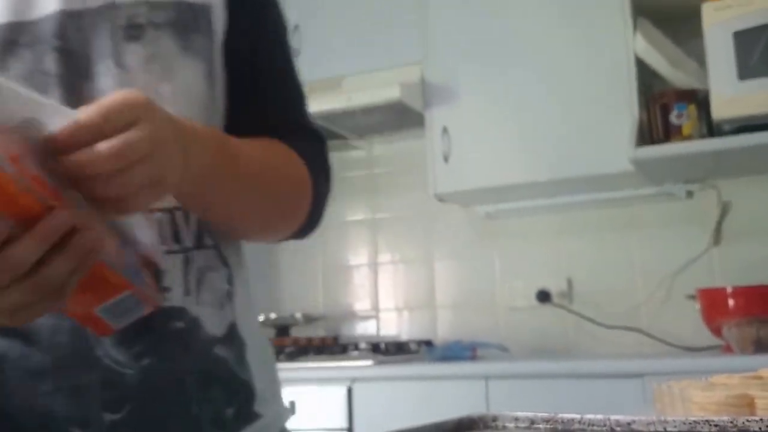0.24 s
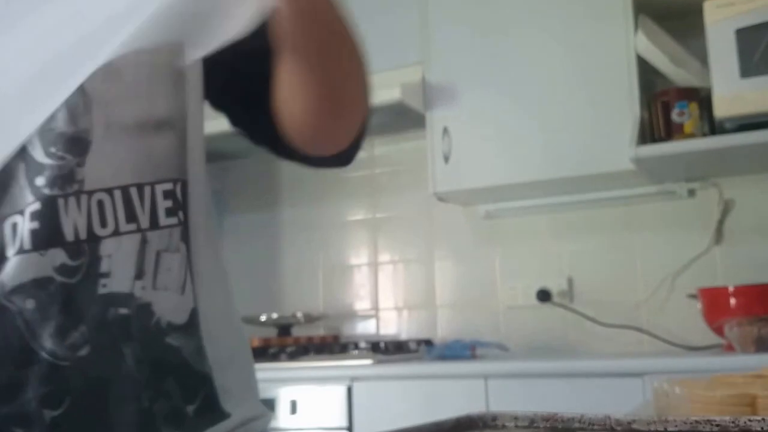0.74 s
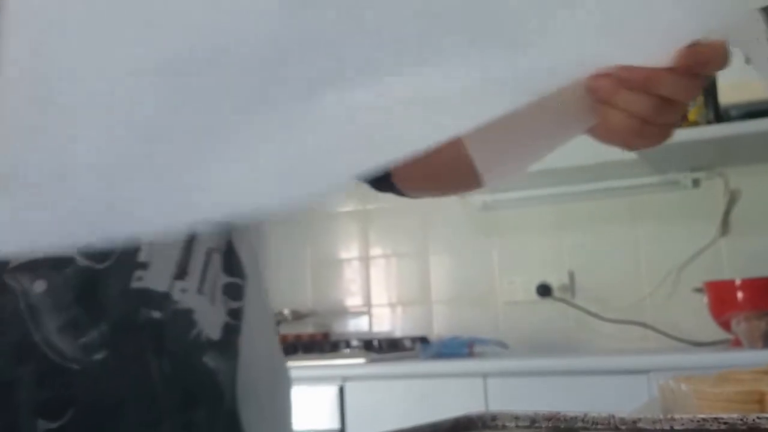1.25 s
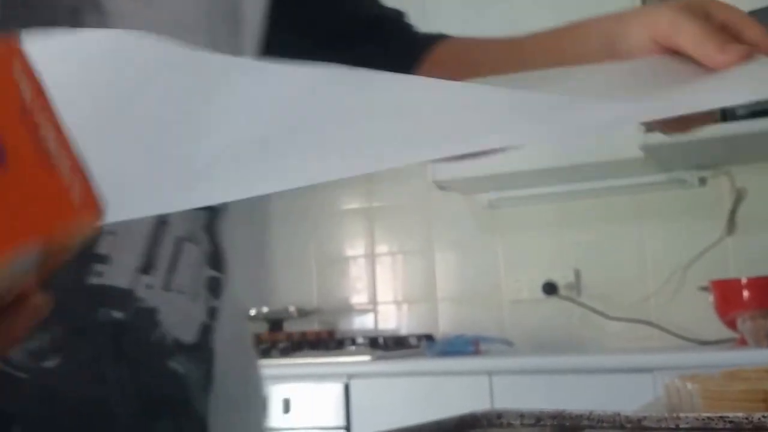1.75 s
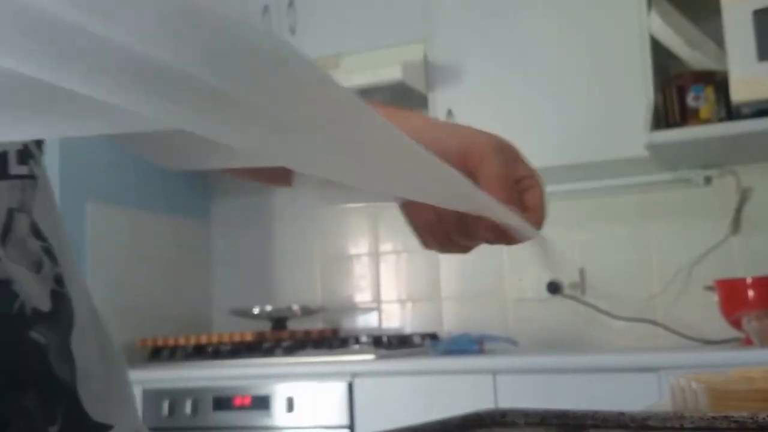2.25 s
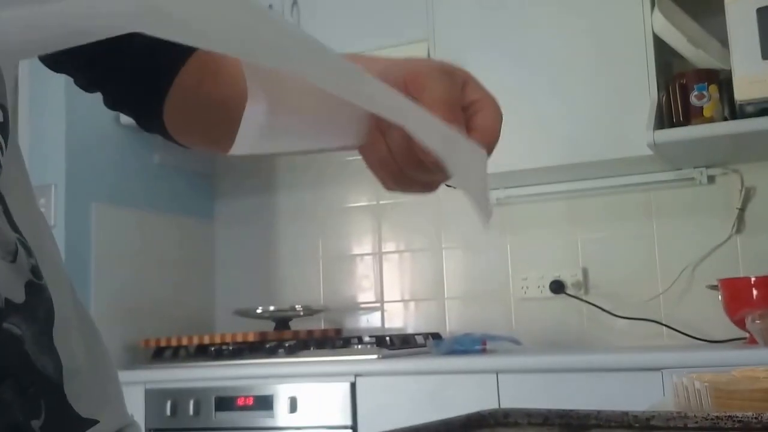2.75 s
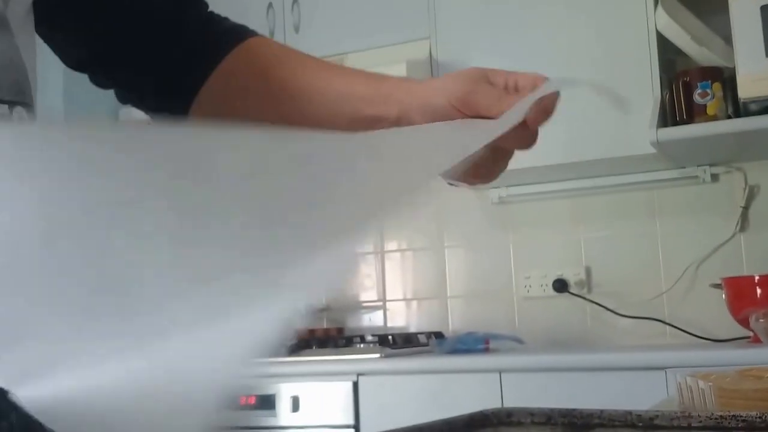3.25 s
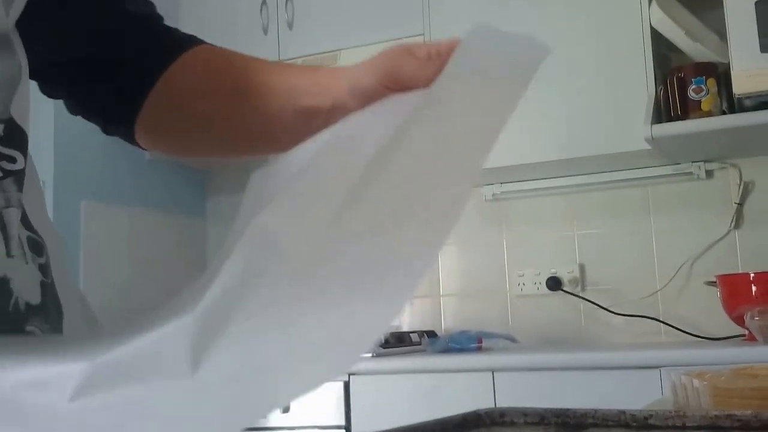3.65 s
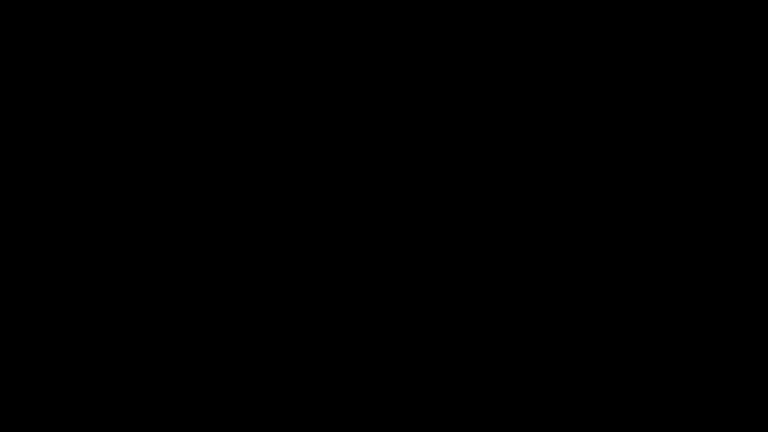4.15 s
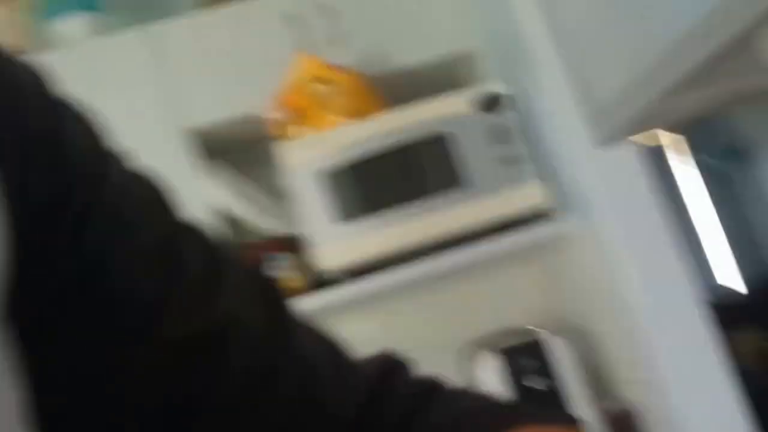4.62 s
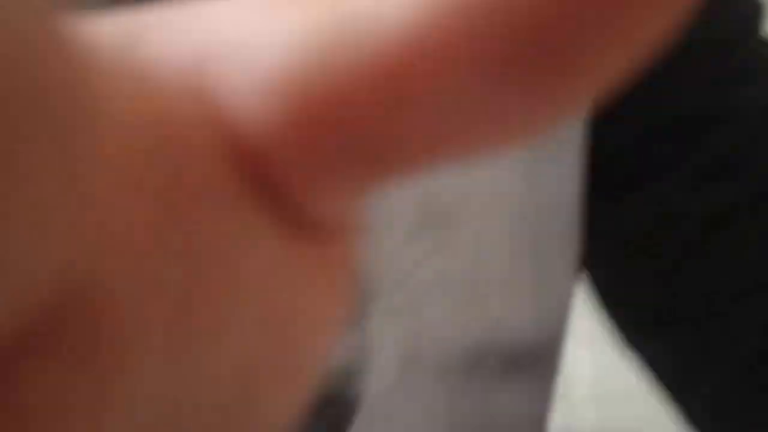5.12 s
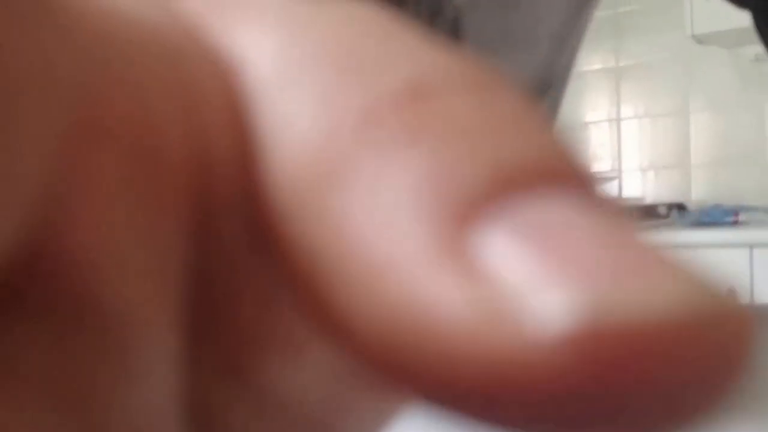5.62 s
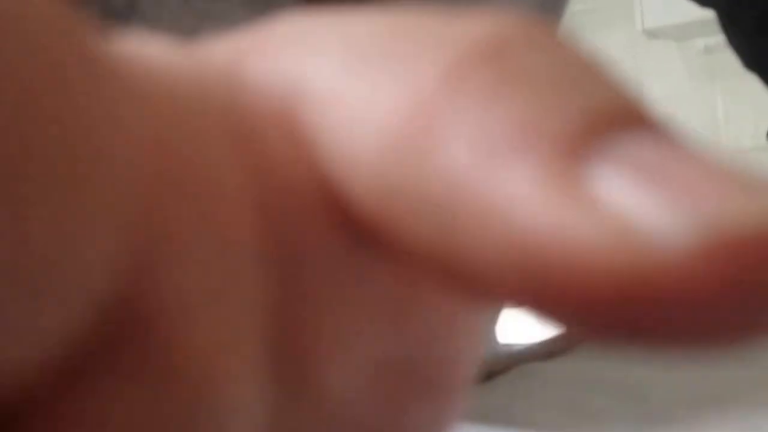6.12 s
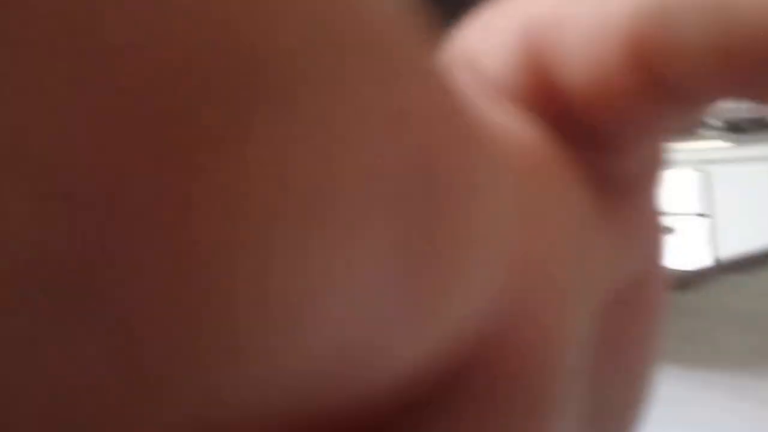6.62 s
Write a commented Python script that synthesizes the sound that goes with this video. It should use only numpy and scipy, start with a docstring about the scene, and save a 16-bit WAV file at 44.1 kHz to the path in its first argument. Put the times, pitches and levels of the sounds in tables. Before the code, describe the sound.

In a small tiled kitchen, baking paper is pulled from its cardboard box with faint hollow bumps and a bright sliding hiss. Rustling grows into loud crackles and soft air flaps as the sheet is shaken with a sharp snap. Fingers then knock and rub the close microphone, sound drops out for half a second, and faint handling noises return.

```python
"""Baking paper is drawn out of its cardboard box in a small tiled kitchen, crinkles and is shaken out
with a loud snap: random clicks ring short noisy facets; hiss, soft air lumps and box modes go with them.
Then a hand takes hold of the camera: fingers knock on its case (modes, thumps, ticks) and rub over the
two microphone ports (filtered noise). The sound cuts out for half a second under the hand,
then more rubs and knocks follow. Quiet coloured noise is the still kitchen."""
import sys
import numpy as np
from scipy import signal
from scipy.fft import rfft, irfft
from scipy.io import wavfile

SR = 44100
rng = np.random.default_rng(int(sys.argv[2]) if len(sys.argv) > 2 else 0)


def unload_audio(sound):
    """Save the sound as a 16-bit wav file, at the path given as the first command line argument."""
    columns = np.transpose(np.atleast_2d(sound))
    # keep every value between -1 and 1, then stretch to whole-number steps
    steps = np.round(np.clip(columns, -1, 1) * 32767)
    wavfile.write(sys.argv[1], SR, steps.astype(np.int16))


N = 302967
TIME = np.arange(N) / SR


def amp(db):
    """Amplitude factor of a level in dB."""
    return 10 ** (np.asarray(db) / 20)


def unit(x):
    """Scales to an rms of one."""
    return x / np.sqrt(np.mean(x ** 2) + 1e-20)


def read(points, hz):
    """Reads a spectrum on a log-frequency axis."""
    f, value = np.transpose(points)
    return np.interp(np.log(hz + 1), np.log(f + 1), value)


def sides(db):
    """Left and right gains for a level difference, at constant power."""
    pair = amp(np.array([[.5], [-.5]]) * db)
    return pair / np.sqrt(np.mean(pair ** 2, axis=0))


def add(mix, s, sound):
    """Mixes a sound in at a time, in place."""
    part = mix[:, max(round(s * SR), 0):][:, :sound.shape[-1]]
    part += sound[..., :part.shape[1]]


def split(x, order, hz, kind):
    """Butterworth filter, kind "low" or "high"."""
    return signal.sosfilt(signal.butter(order, hz, kind, fs=SR, output="sos"), x)


def colour(x, points, size=2048):
    """Minimum-phase filter with the given spectrum shape; keeps the power of white noise."""
    hz = abs(np.fft.fftfreq(size, 1 / SR))
    log_gain = np.log(amp(read(points, hz)))
    spectrum = np.exp(np.conj(signal.hilbert(log_gain)))
    taps = np.fft.ifft(spectrum).real[:size // 2]
    taps /= np.linalg.norm(taps)
    return signal.oaconvolve(x, taps[None], axes=1)[:, :x.shape[1]]


def noise(shared):
    """White noise at two ports; shared is the common fraction of the power."""
    common, *own = rng.standard_normal((3, N))
    shared = np.clip(shared, 0, 1)
    return np.sqrt(shared) * common + np.sqrt(1 - shared) * np.array(own)


def lumps(depth_db, hz):
    """A gain of unit rms that wanders at random, with hz new targets a second."""
    knots = rng.standard_normal(N // 20)
    wander = np.interp(TIME * hz, np.arange(len(knots)), knots)
    return unit(amp(depth_db * wander))


def clicks(per_s, spread_db):
    """Random clicks of either sign, most small and a few large, at unit rms."""
    size = amp(spread_db * np.minimum(rng.exponential(1, N), 4))
    sign = rng.choice([-1, 1], N)
    fires = rng.random(N) < per_s / SR
    return unit(size * sign * fires)


def ring(modes, t):
    """Sum of exponentially dying modes, scaled to a peak of one."""
    wave = sum(amp(db - 60 * t / t60) * np.sin(2 * np.pi * hz * t) for hz, db, t60 in modes)
    return wave / abs(wave).max()


def thud(hz, rise_s, decay_s):
    """A soft low push that swings a few times, peak one."""
    t = TIME[:SR // 4]
    wave = np.sin(2 * np.pi * hz * t) * (1 - np.exp(-t / rise_s)) * np.exp(-t / decay_s)
    return wave / abs(wave).max()


def gesture(s, rise_s, hold_s, decay_s):
    """A movement builds up linearly, lasts, and dies away exponentially."""
    build = np.clip((TIME - s) / rise_s, 0, 1)
    return build * np.exp(-np.clip((TIME - s - rise_s - hold_s) / decay_s, 0, 20))


def together(rows):
    """Level of overlapping movements (start_s, level_db, rise_s, hold_s, decay_s): their powers add."""
    power = sum((amp(db) * gesture(s, *shape)) ** 2 for s, db, *shape in rows)
    return np.sqrt(power + 1e-14)


# still kitchen spectrum: [hz, relative_density_db]
AIR_SPECTRUM = [(18, -50), (30, -18.5), (100, 2.5), (214, -1.5), (271, -15.5), (390, 0.5), (563, -8.5),
                (1200, -13), (3340, -20.5), (10300, -21), (15700, -24)]


def still_air(level_db=-59.5):
    """Steady background noise, mostly common to both ports."""
    return amp(level_db) * colour(noise(shared=0.77), AIR_SPECTRUM)


# kitchen reverberation: [hz, t60_s]
KITCHEN_DECAY = [(100, 0.15), (500, 0.29), (2000, 0.38), (6000, 0.37), (15000, 0.27)]


def kitchen(x, wet_db, drift_hz=3.1, count=4, size=256):
    """Tiles and cupboards throw back a dense short tail; its pattern cycles at drift_hz."""
    shape = (count, 2, SR // 2)
    taps = rng.standard_normal(shape) * (rng.random(shape) < .1)
    taps[..., :size // 2] = 0
    hz, t, z = signal.stft(taps, SR, nperseg=size)
    decay = amp(-60 * t / read(KITCHEN_DECAY, hz)[:, None])
    tails = signal.istft(z * decay, SR, nperseg=size)[1]
    tails *= amp(wet_db) / np.linalg.norm(tails, axis=-1, keepdims=True)
    phase = drift_hz * TIME + np.arange(count)[:, None] / count
    share = np.maximum(np.cos(2 * np.pi * phase), 0)
    wet = sum(signal.oaconvolve(x * part, tail, axes=1)[:, :N] for part, tail in zip(share, tails))
    return (x + wet) / np.sqrt(1 + amp(2 * wet_db))


# left port colour against the right: [hz, left_minus_right_db]
PORT_COLOUR = [(60, -8), (92, -7), (140, -3), (210, -13.5), (330, -0.5), (500, -9.5), (770, -5.5),
               (1170, -10), (1790, -11.5), (2740, -1.5), (4190, 7.5), (6410, -4), (9810, -6), (15000, 0.5)]


def ports(x):
    """The two microphone ports resonate differently."""
    gains = sides(read(PORT_COLOUR, np.fft.rfftfreq(N, 1 / SR)))
    return irfft(rfft(x) * gains, N)


# skin strokes over the ports, levels before trim:
# [start_s, rub_db, hiss_db, left_minus_right_db, rise_s, hold_s, decay_s]
RUB_STROKES = [(5.457, -20.5, -28.5, -2, .005, 0.033, 0.092), (5.568, -27, -47, -14, 0.057, 0.14, 0.035),
               (5.689, -25, -28.5, -23, 0.093, .05, .008), (5.795, -13.5, -19, -18, 0.041, 0.036, 0.0029),
               (6.413, -36, -44.5, -21, 0.0033, 0.013, 0.0082), (6.426, -47, -51, -14, 0.011, 0.055, 0.014),
               (6.518, -47.5, -43, -18, 0.017, .03, 0.0087), (6.574, -71, -61.5, -4, 0.027, 0.29, .03),
               (6.703, -46, -38, -17, .002, .005, 0.032), (6.749, -45, -57, -2, .02, 0.055, 0.032)]
# dull rub spectrum: [hz, relative_density_db]
SKIN_SPECTRUM = [(30, -14.5), (80, 3), (160, 1.5), (300, -1.5), (600, -7), (1000, -9), (1350, -11.5),
                 (1750, -15), (2300, -21.5), (3200, -26.5), (8000, -62)]
# fine hiss spectrum: [hz, relative_density_db]
SKIN_HISS_SPECTRUM = [(1000, -31), (2500, -26.5), (5000, -3.5), (8000, -5), (11000, 2), (13000, -9.5),
                      (16000, -18.5)]


def fingers(rub_trim_db=3, rasp_trim_db=8, hiss_trim_db=0, split_hz=550):
    """Skin sticks and slips over the ports: dull rumble, fine hiss, and a rasp that grows with both."""
    rub, hiss = np.zeros((2, 2, N))
    for s, rub_db, hiss_db, pan_db, *shape in RUB_STROKES:
        stroke = sides(pan_db) * gesture(s, *shape)
        rub = np.hypot(rub, amp(rub_db) * stroke)
        hiss = np.hypot(hiss, amp(hiss_db) * stroke)
    scrape = colour(noise(shared=0.19) * lumps(depth_db=2.5, hz=150), SKIN_SPECTRUM)
    rumble = amp(rub_trim_db) * rub * split(scrape, 3, split_hz, "low")
    rasp = amp(rasp_trim_db) * np.sqrt(rub * hiss) * split(scrape, 3, split_hz, "high")
    fizz = colour(noise(shared=.1) * lumps(depth_db=3.5, hz=442), SKIN_HISS_SPECTRUM)
    return rumble + rasp + amp(hiss_trim_db) * hiss * fizz


# finger knocks, levels before trim:
# [start_s, case_db, thump_db, tick_db, left_minus_right_db, tick_decay_s, thump_decay_s]
KNOCK_HITS = [(4.894, -26, -57, -52, -5, .005, .007), (4.914, -23, -63.5, -50, -4, .005, .007),
              (4.939, -30.5, -52, -58, -5, .005, 0.009), (5.396, -24.5, -61, -58, -4, .005, 0.0075),
              (5.4639, -3, -35, -13, -2.5, 0.0093, .007), (5.473, -13, -10, -13.5, -.5, 0.011, 0.006),
              (5.5173, -2, -16, -44, -4.5, .005, .007), (5.572, -10.5, -21, -41.5, -7.5, .005, 0.0097),
              (5.609, -18, -28.5, -11.5, 1.5, 0.0055, .007), (5.727, -14, -29, -26.5, 2, 0.0061, 0.0092),
              (5.867, -34, -8, -5.5, 11, 0.0043, 0.018), (6.605, -72, -44, -68, -10, .003, .009),
              (6.6628, -67, -62, -31.5, 14, 0.0015, .007), (6.683, -44, -33, -38, -11, 0.0024, 0.015),
              (6.7634, -46, -50, -30, -5, 0.0028, .007), (6.7668, -31.5, -17, -13.5, 10, 0.0057, 0.013),
              (6.8065, -61, -39, -26, -16, .0015, .007)]
# case modes: [hz, relative_level_db, t60_s]
CASE_MODES = [(136, -10, 0.11), (270, -15, 0.11), (417, 5, 0.072), (474, -5.5, 0.026), (600, -4.5, .04),
              (925, 0, 0.033), (1150, -27.5, 0.033), (1600, -15.5, 0.033)]
# ring of the ports in each tick: [hz, relative_level_db, t60_s]
PORT_RING_MODES = [(3170, -10, 0.025), (4090, 1, 0.041), (4570, 2.5, 0.04)]
# tick spectrum: [hz, relative_density_db]
TICK_SPECTRUM = [(200, 9.5), (900, 1.5), (2300, -3.5), (3200, -7.5), (4300, -5.5), (6500, -6.5),
                 (10000, -9.5), (13000, -19), (16000, -30.5)]


def knocks(case_trim_db=6, thump_trim_db=1, tick_trim_db=2, port_ring_db=-7,
           press_s=0.0025, scuff=0.021, scuff_decay_s=0.011):
    """A finger lands with a tick and a scuff, rings the case and pumps air into the ports."""
    body, ticks, t = np.zeros((2, N)), np.zeros((2, N)), TIME[:SR // 4]
    case_ring, port_ring = ring(CASE_MODES, t), ring(PORT_RING_MODES, t)
    for s, case_db, thump_db, tick_db, pan_db, tick_decay_s, thump_decay_s in KNOCK_HITS:
        grit = rng.standard_normal((2, len(t)))
        contact = signal.unit_impulse(len(t)) + scuff * grit * np.exp(-t / scuff_decay_s)
        case = signal.fftconvolve(contact, case_ring[None], axes=1)[:, :len(t)]
        case *= amp(case_db + case_trim_db) * (1 - np.exp(-t / press_s))
        thump = amp(thump_db + thump_trim_db) * thud(hz=81, rise_s=0.0037, decay_s=thump_decay_s)
        tick = grit * np.exp(-t / tick_decay_s) + amp(port_ring_db) * port_ring
        add(body, s, sides(pan_db) * (case + thump))
        add(ticks, s, sides(pan_db) * amp(tick_db + tick_trim_db) * tick)
    return body + ports(colour(ticks, TICK_SPECTRUM))


# roll bumps in its box, levels before trim: [start_s, ring_db, thud_db, pitch_factor]
BOX_BUMPS = [(.238, -21, -48, 1.01), (.39, -30.5, -41, 0.67), (0.405, -38.5, -39, 0.82),
             (.607, -39, -45, 0.79), (.628, -43.5, -40.5, 0.59), (1.461, -39.5, -66, 1.14),
             (1.492, -35, -70, 1.2), (1.534, -36.5, -74, 1.12), (1.556, -43, -66, 1.14),
             (5.184, -25, -68, 1.0)]
# cardboard modes at pitch_factor 1: [hz, relative_level_db, t60_s]
BOX_MODES = [(390, -30, 0.067), (556, 12, 0.069), (589, 15.5, 0.073), (932, 14, 0.055), (990, 23.5, 0.025),
             (1180, -13, .04), (1460, -19, 0.058)]
# roll turns against the cardboard, levels before trim: [start_s, level_db, rise_s, hold_s, decay_s]
ROLL_TURNS = [(1.31, -58.5, 0.04, 0.024, .03), (1.44, -51, 0.053, .005, 0.013),
              (1.528, -40, 0.0044, 0.0036, 0.023), (1.64, -54, .04, .015, .03)]
# scrape spectrum: [hz, relative_density_db]
SCRAPE_SPECTRUM = [(300, -38), (700, -19), (1050, -1.5), (1300, -0.5), (1650, -8.5), (2200, -23),
                   (5000, -25)]


def box(ring_trim_db=3, thud_trim_db=1, scrape_trim_db=1):
    """The roll bumps the cardboard with a hollow ring and a dull thud, and scrapes as it turns."""
    out, t = np.zeros((2, N)), TIME[:SR // 4]
    dull = thud(hz=130.4, rise_s=0.0016, decay_s=0.0042)
    for s, ring_db, thud_db, pitch in BOX_BUMPS:
        hollow = ring(BOX_MODES, t * pitch) * (1 - np.exp(-t / 0.00055))
        add(out, s, amp(ring_db + ring_trim_db) * hollow + amp(thud_db + thud_trim_db) * dull)
    slips = clicks(per_s=1100, spread_db=2.5) * together(ROLL_TURNS)
    return out + amp(scrape_trim_db) * colour(slips[None], SCRAPE_SPECTRUM)


# sheet slides over the box edge, levels before trim: [start_s, level_db, rise_s, hold_s, decay_s]
EDGE_PULLS = [(0, -31, 0.0016, .002, 0.02), (.26, -43, 0.0084, 0.069, 0.052), (1.86, -38, 0.073, .07, .02),
              (2.01, -28.5, 0.11, 0.54, 0.029)]
# edge hiss spectrum: [hz, relative_density_db]
EDGE_SPECTRUM = [(250, -27), (500, -12), (1200, -3), (2600, -7), (4600, -1.5), (7000, -5), (10300, -0.5),
                 (13000, -8), (15700, -15.5)]


def pull(trim_db=.5):
    """Paper dragged over cardboard gives an even, bright hiss."""
    drag = noise(shared=.3) * together(EDGE_PULLS) * lumps(depth_db=0.4, hz=59.8)
    return amp(trim_db) * colour(drag, EDGE_SPECTRUM)


# wide panel flaps over, levels before trim: [peak_s, level_db, half_length_s]
PANEL_FLAPS = [(2.108, -52, 0.058), (2.649, -32, 0.017), (3.438, -42.5, 0.02), (3.562, -38, 0.02),
               (4.058, -32.5, 0.031), (4.235, -39, 0.067), (4.352, -23.5, 0.013), (4.412, -48, 0.035)]
# shakes that buckle the whole sheet, levels before trim:
# [start_s, crackle_db, flutter_db, rise_s, hold_s, decay_s]
SHEET_SHAKES = [(3.637, -17.5, -32, 0.0093, 0.062, 0.011), (3.897, -11.5, -23.5, 0.031, 0.027, 0.005),
                (4.5488, -13, -17, 0.0021, 0.0031, 0.017), (4.553, -6, -26, 0.0044, 0.12, 0.023)]
# flutter spectrum: [hz, relative_density_db]
FLUTTER_SPECTRUM = [(25, -15.5), (50, -0.5), (85, 8), (140, 3.5), (200, 5), (265, -10.5), (340, 3),
                    (420, 7.5), (560, -2), (900, -4.5), (2000, -60)]


def flutter(effort, move_trim_db=-31, flap_trim_db=-1, shake_trim_db=0):
    """The flexing sheet pushes air in soft lumps: a little with each move, more when flapped or shaken."""
    flaps = sum(amp(db) * np.exp(-((TIME - s) / half_s) ** 2) for s, db, half_s in PANEL_FLAPS)
    shakes = sum(amp(db) * gesture(s, *shape) for s, _, db, *shape in SHEET_SHAKES)
    push = amp(move_trim_db) * effort + amp(flap_trim_db) * flaps + amp(shake_trim_db) * shakes
    return colour(noise(shared=0.8) * push * lumps(depth_db=5.0, hz=56.6), FLUTTER_SPECTRUM)


# hands pull or bend the sheet, levels before trim: [start_s, level_db, rise_s, hold_s, decay_s]
HAND_MOVES = [(.21, -45.5, 0.024, 0.14, 0.058), (.56, -41.5, 0.039, .005, 0.046),
              (.68, -54, 0.013, .005, 0.066), (.865, -51.5, 0.014, 0.046, .03),
              (.95, -41, 0.009, .004, 0.017), (.98, -59.5, 0.041, .09, 0.11), (1.31, -60, 0.056, 0.17, .05),
              (1.53, -55.5, .01, .06, 0.25), (1.735, -40, 0.071, 0.025, 0.028),
              (1.84, -32.5, 0.12, .06, .02), (2.01, -25, 0.0057, .01, 0.034),
              (2.06, -23.5, 0.013, 0.036, 0.066), (2.16, -27, 0.17, 0.33, 0.077),
              (2.51, -23, 0.012, .02, .03), (2.75, -26.5, 0.12, 0.032, .045),
              (2.99, -34.5, 0.034, 0.089, .04), (3.2, -35.5, 0.0099, 0.013, 0.067),
              (3.285, -31, 0.017, 0.017, 0.051), (3.37, -21.5, 0.058, 0.0079, 0.043),
              (3.52, -19.5, .065, .005, 0.048), (3.61, -21.5, 0.018, 0.039, 0.16),
              (3.78, -24, .02, 0.0044, .02), (3.87, -11, 0.047, 0.0061, 0.014),
              (4.02, -24.5, 0.0069, 0.014, 0.033), (4.13, -17, 0.09, 0.02, 0.032),
              (4.308, -16, 0.014, 0.033, 0.01), (4.37, -24, 0.027, .115, 0.014),
              (4.7, -24, 0.014, 0.0042, 0.14), (4.85, -38.5, 0.096, .15, 0.039),
              (5.13, -24, 0.077, 0.014, 0.062), (5.35, -31, 0.098, .03, .02),
              (5.458, -17, 0.0081, 0.0044, 0.064), (5.607, -19, 0.0069, 0.0023, 0.0044),
              (5.76, -17.5, 0.18, .01, 0.011)]


def hand_effort():
    """Combined strength of the hand movements that drive rustle and flutter."""
    return together(HAND_MOVES)


def facets(drive, decay_s, scatter, size=160):
    """Each click rings the facet buckling just then; each facet has its own colour and direction."""
    t, out = TIME[:2 * size], np.zeros((2, N))
    for start in range(0, N, size):
        ripple = rng.standard_normal((2, len(t))) * np.exp(-t / decay_s)
        ripple *= scatter / np.linalg.norm(ripple, axis=1, keepdims=True)
        # direct sound reaches the left port first, the right 8-13 samples later
        ripple[[0, 1], [0, rng.integers(8, 14)]] += 1
        block = drive[start:start + size]
        add(out, start / SR, np.array([np.convolve(block, port) for port in ripple]))
    return out / np.sqrt(1 + scatter ** 2)


# creases that snap through, before trim: [start_s, level_db, hollow_middle_db]
CREASE_SNAPS = [(.1626, -40.5, 0), (0.2388, -29.5, 2), (0.2665, -20, -12), (0.314, -26, -24),
                (0.381, -28, -4), (.5232, -44, -18), (.606, -38, 6.5), (0.693, -33, -4), (.7437, -36.5, -8),
                (0.7696, -38, -16), (1.5316, -34, -12), (1.7505, -25.5, -8), (1.8417, -17.5, -29),
                (1.933, -20.5, 0), (1.9488, -24, 1), (2.0173, -5, -12), (2.0911, -9, -11),
                (2.1238, -9.5, -6.5), (2.2189, -7, -12.5), (2.404, -7.5, -34), (2.536, -3.5, -21),
                (2.557, -12.5, -2), (2.797, -15.5, -12), (2.816, -20, -24), (2.8594, -12.5, -19),
                (2.934, -19, -6), (3.053, -15, -5.5), (3.09, -15.5, -18), (3.451, -24, -3),
                (3.657, -7.5, -25), (3.7012, -10.5, -34), (3.8435, -9, -13), (3.8919, -6.5, -15),
                (4.0288, -4.5, -9), (4.0445, -3.5, -13.5), (4.1128, -8.5, -16.5), (4.135, -13, -7),
                (4.151, -9.5, -11.5), (4.1912, -7.5, -9.5), (4.2218, -3.5, -24.5), (4.3188, -2, -11.5),
                (4.3495, -4.5, -11.5), (4.4135, -9, -15), (4.5393, -3, -11), (4.8176, -14.5, -5.5),
                (4.8295, -20, -8), (5.0687, -20, -12), (5.1443, -19.5, -25.5), (5.166, -37, -7),
                (5.2152, -11, -16), (5.2744, -11.5, -15), (5.377, -19, -6.5), (5.431, -24.5, -6)]
# paper spectrum: [hz, relative_density_db]
PAPER_SPECTRUM = [(150, -47.5), (270, -32.5), (420, -12.5), (560, -14), (800, -10), (1100, -5.5),
                  (1650, -5), (2600, -7.5), (3500, -6), (4600, 0.5), (7000, -9.5), (10300, -7.5),
                  (13000, -20.5), (15700, -30)]
# gentle moves sound hollow, hard pulls bright: hollow gain (before trim) falls with effort, up to a cap
HOLLOW_PIVOT_DB, HOLLOW_SLOPE_DB_PER_DB, HOLLOW_MAX_DB = -40.5, 0.43, 3.5
SNAP_DECAY_S, CRACK_GAIN, CRACK_DECAY_S = 0.012, .7, .0025


def crinkles(effort, rustle_trim_db=-1, snap_trim_db=-6, bite=0.6, shake_trim_db=3, hollow_trim_db=9,
             snap_hollow_trim_db=9, slack_db=-3.0, split_hz=2200):
    """Random tiny buckles make the rustle; snaps and shakes are avalanches of them."""
    buckles = clicks(per_s=6000, spread_db=2.0) * lumps(depth_db=1.1, hz=129.8)
    rustle = amp(rustle_trim_db) * effort * buckles
    effort_db = 20 * np.log10(effort)
    hollow_db = np.minimum(HOLLOW_SLOPE_DB_PER_DB * (HOLLOW_PIVOT_DB - effort_db), HOLLOW_MAX_DB)
    hollow = amp(hollow_trim_db + hollow_db)

    shakes = sum(amp(db) * gesture(s, *shape) for s, db, _, *shape in SHEET_SHAKES)
    avalanche = amp(shake_trim_db) * shakes * lumps(depth_db=1.5, hz=198.8)
    slack, t = avalanche * amp(slack_db), TIME[:SR // 8]
    for s, db, middle_db in CREASE_SNAPS:
        burst = amp(db + snap_trim_db) * np.exp(-t / SNAP_DECAY_S)
        # the main crease goes first, with a bright crack
        add(avalanche[None], s, burst * (1 + CRACK_GAIN * np.exp(-t / CRACK_DECAY_S)))
        add(slack[None], s, burst * amp(middle_db + snap_hollow_trim_db))

    dense = clicks(per_s=20000, spread_db=3.5)
    # forced buckles are quicker, so brighter
    forced = signal.lfilter([1, -bite], [1], avalanche * dense)
    # tight creases give the treble, wide slack panels the hollow middle
    tight = facets(rustle + forced, decay_s=0.0034, scatter=1.0)
    wide = facets(rustle * hollow + slack * dense, decay_s=0.0034, scatter=0.67)
    both = split(tight, 5, split_hz, "high") + split(wide, 5, split_hz, "low")
    return colour(both, PAPER_SPECTRUM)


# sheet position: [time_s, left_minus_right_db]
SHEET_PLACE = [(0, 2), (1.6, 3.5), (2.2, 2), (2.9, 3), (4.7, 3.5), (5.45, 4.5)]


def scene():
    """Paper and box sound through the kitchen; the hand acts on the camera itself."""
    effort = hand_effort()
    place_db = np.interp(TIME, *np.transpose(SHEET_PLACE))
    paper = (crinkles(effort) + pull()) * sides(place_db)
    airborne = ports(kitchen(paper + flutter(effort) + box(), wet_db=-6.0))
    return airborne + knocks() + fingers() + still_air()


# input dropout under the hand: [start_s, end_s]
DROPOUT = (5.889, 6.413)


def record(dry, bass_hz=42, edge_hz=15850):
    """Deep bass is rolled off, peaks beyond full scale clip, the input drops out, the band ends steeply."""
    live = (TIME < DROPOUT[0]) | (TIME > DROPOUT[1])
    heard = np.clip(split(dry, 1, bass_hz, "high"), -1, 1) * live
    lowpass = signal.firwin(511, edge_hz, window=("kaiser", 9), fs=SR)
    return signal.oaconvolve(heard, lowpass[None], "same")


dry = scene()
out = record(dry)
unload_audio(out)
```